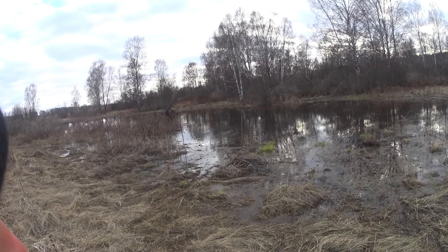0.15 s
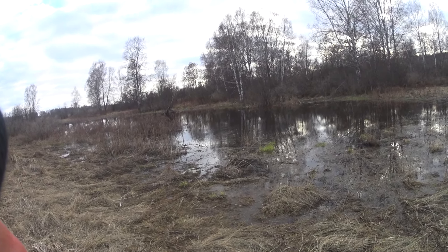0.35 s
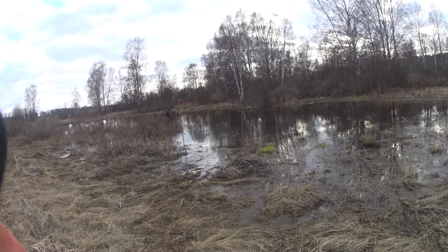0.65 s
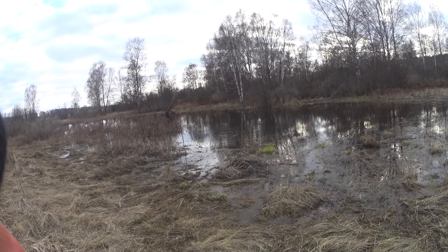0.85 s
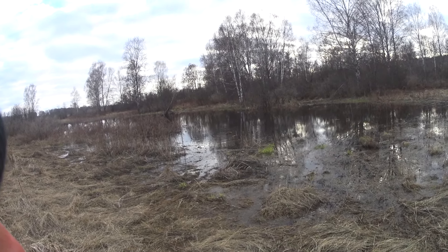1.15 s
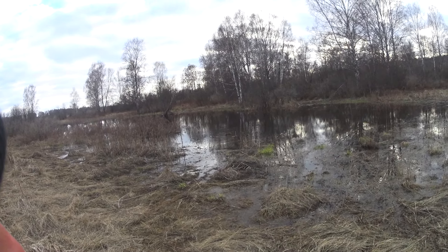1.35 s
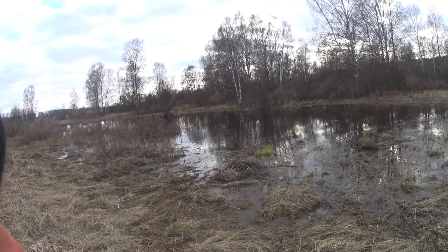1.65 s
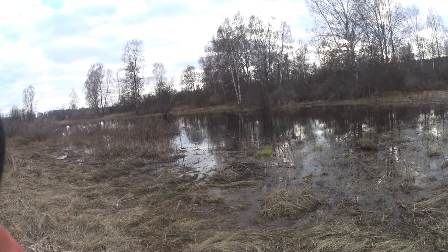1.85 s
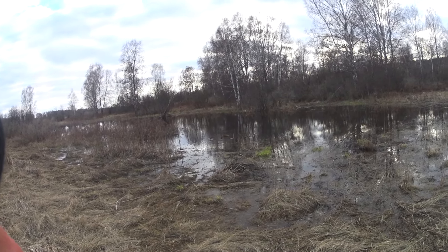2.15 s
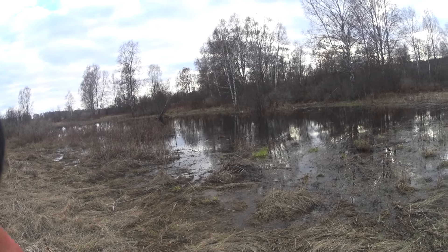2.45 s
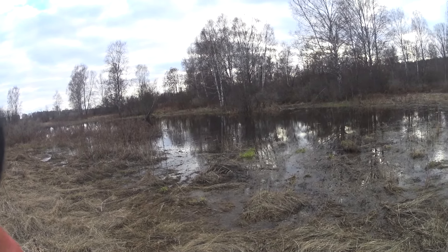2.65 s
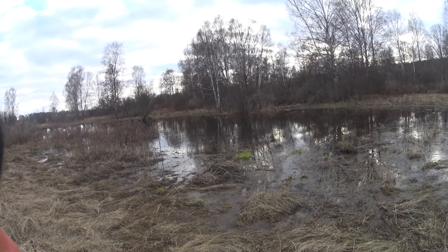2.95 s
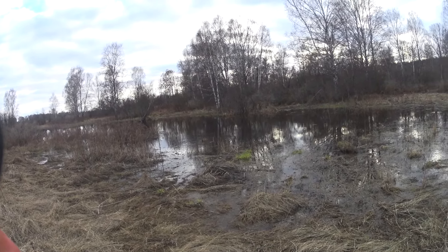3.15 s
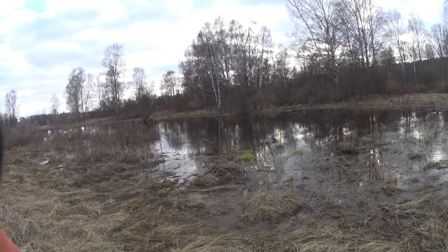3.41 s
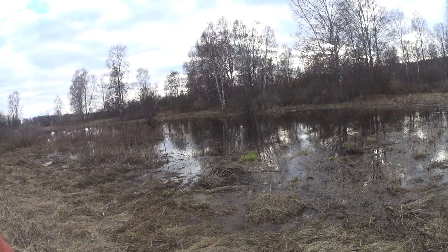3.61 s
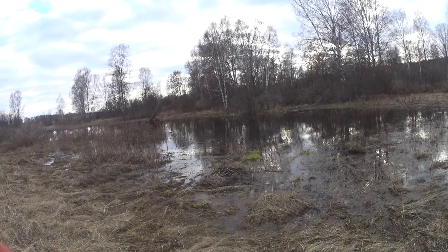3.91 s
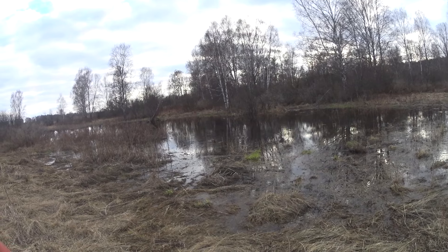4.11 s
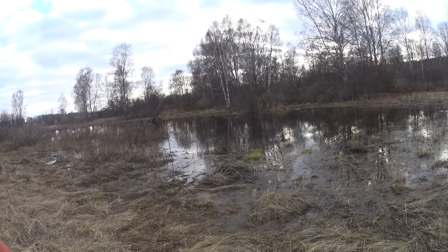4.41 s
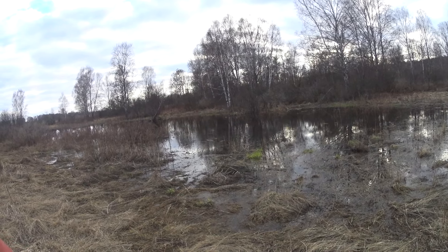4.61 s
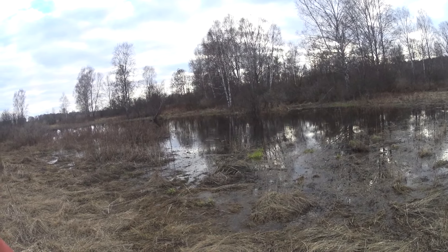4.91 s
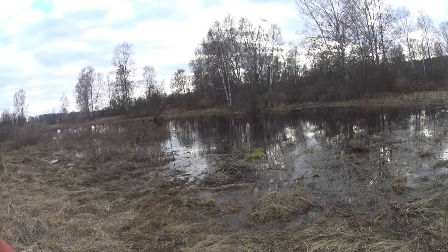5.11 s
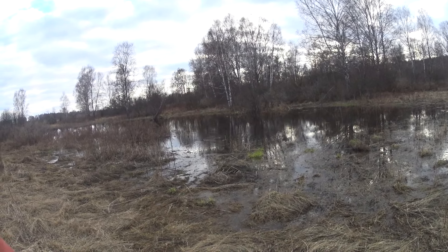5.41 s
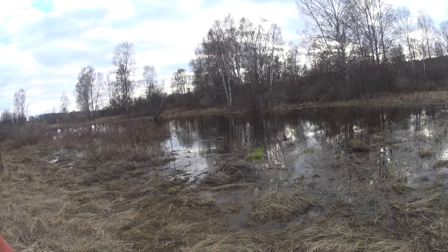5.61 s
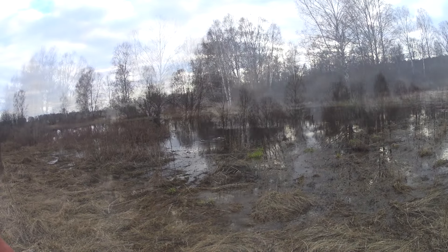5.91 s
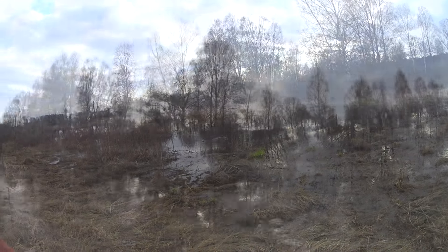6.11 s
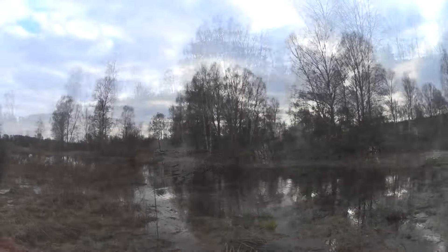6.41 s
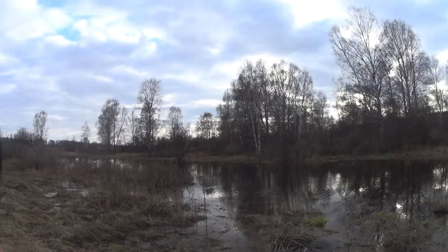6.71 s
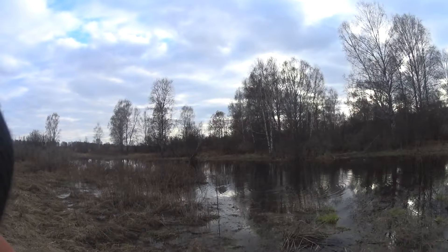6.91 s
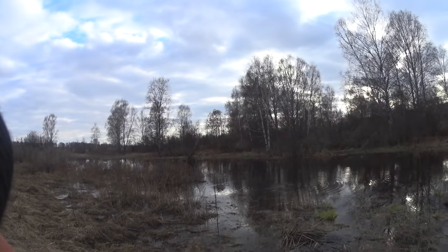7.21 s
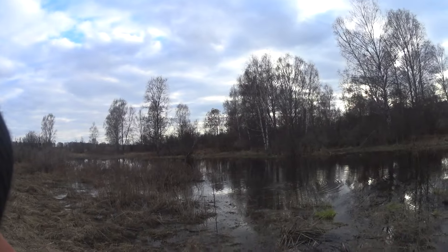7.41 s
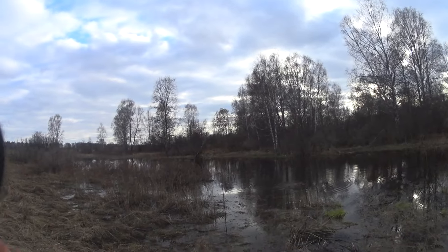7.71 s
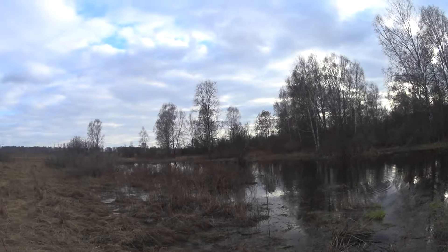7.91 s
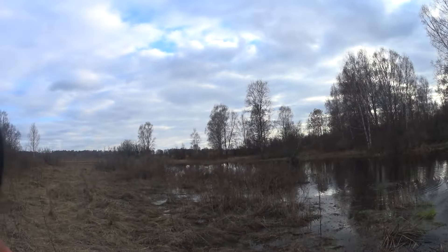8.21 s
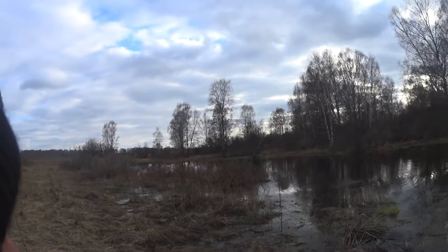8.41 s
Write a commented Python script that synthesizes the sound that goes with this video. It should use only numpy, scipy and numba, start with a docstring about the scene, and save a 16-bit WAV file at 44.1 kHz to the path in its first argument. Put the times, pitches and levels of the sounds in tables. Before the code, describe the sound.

Open marsh, heard through a small stereo camera microphone with little extreme treble. A faint, dull distant roar and a deep, unevenly throbbing rumble run throughout, the rumble slowly growing, with soft low thumps near 0.9, 1.6, 3.9, 4.2 and 5 seconds. A hen duck gives short, raspy, nasal quacks, each under 0.2 seconds, scooping up, breaking register and shutting off; trees answer faintly. Quacks come at 0.04, 0.7, 1.4 and 2.2 seconds, gaining strength. Tiny dry ticks sound at 2.9 and 3.3 during a pause. Another quack comes at 4.8, then a very faint one at 5.7. Close ticks appear at 5.6 and 5.95, with the sharpest at 6.2. From 5.6 to 6.6 the background crossfades into a clearly louder roar. Three final quacks follow at 6.35, 7.06 and 7.7, the last two loudest, before background alone remains.

```python
"""A distant roar and a low, throbbing rumble (shaped noise) lie under a marsh from beginning to end.
From the start a hen decoy duck quacks nine times: paired claps ring a throat that slides as the bill opens,
with rasping air on top. Each quack scoops up, breaks to another register and ends; trees answer faintly.
From about 3 s a few dry ticks (tiny noise bursts) sound close by, most of them near 6 s.
Around 6 s the scene fades to a second spot with a louder roar, where the last three quacks are heard."""
import sys
import numpy as np
from scipy import signal
from scipy.fft import rfft, irfft, next_fast_len
from scipy.io import wavfile
from scipy.ndimage import uniform_filter1d
from numba import njit

SR = 44100
rng = np.random.default_rng(int(sys.argv[2]) if len(sys.argv) > 2 else 0)


def store_wav(level_fs):
    """Save 16-bit WAV to argv[1]."""
    pcm = np.round(np.clip(np.atleast_2d(level_fs), -1, 1) * 32767)
    wavfile.write(sys.argv[1], SR, pcm.T.astype(np.int16))


N = 377055
TIME = np.arange(N) / SR  # seconds
# the fade from the first spot to the second (seconds)
FADE_START_S, FADE_LENGTH_S = 5.625, 1


def undb(db):
    """Turn decibels into a gain."""
    return 10 ** (np.asarray(db) / 20)


def unit(x):
    """Scale a sound to an rms of 1."""
    return x / np.sqrt(np.mean(x ** 2))


def over_hz(points, hz):
    """Read a curve of (Hz, value) points on a log-frequency axis."""
    point_hz, value = np.transpose(points)
    return np.interp(np.log(hz), np.log(point_hz), value)


def colour(x, points):
    """Filter to a (Hz, dB) curve without sounding early, so that claps keep their sharp front."""
    size = 2 * next_fast_len(x.shape[-1] // 2 + 1)
    hz = np.maximum(np.fft.rfftfreq(size, 1 / SR), 1)
    # folding the cepstrum gives the filter that reacts soonest (minimum phase)
    cepstrum = irfft(np.log(undb(over_hz(points, hz))))
    cepstrum[1:size // 2] *= 2
    cepstrum[size // 2 + 1:] = 0
    response = np.exp(rfft(cepstrum))
    return irfft(rfft(x, size) * response, size)[..., :x.shape[-1]]


def walk(rate, size):
    """Wander slowly: random levels, drawn `rate` times a second and smoothed."""
    hold = int(SR / rate)
    levels = np.repeat(rng.standard_normal(size // hold + 1), hold)
    return uniform_filter1d(levels, hold)[:size]


@njit
def resonate(x, hz, width):
    """Ring around a centre frequency that may move with every sample (a band-pass)."""
    y, band, low = np.empty(len(x)), 0., 0.
    for i in range(len(x)):
        g, damping = np.tan(np.pi * hz[i] / SR), width / hz[i]
        v = (band + g * (x[i] + 1e-18 - low)) / (1 + g * (g + damping))
        band, low, y[i] = 2 * v - band, low + 2 * g * v, damping * v
    return y


def clicks(at, sizes, count):
    """Place smooth, band-limited clicks, which may fall between two samples."""
    taps = at.astype(int)[:, None] + np.arange(-6, 8)
    off = taps - at[:, None]
    shape = np.sinc(off) * np.cos(np.pi * off / 14) ** 2
    inside = np.clip(taps, 0, count - 1)
    return np.bincount(inside.ravel(), (shape * sizes[:, None]).ravel(), count)


def steady(x, hz):
    """Hold the rms near 1 over a few cycles of pitch hz."""
    k = int(2 * SR / hz)
    power = uniform_filter1d(uniform_filter1d(x ** 2, k), k)
    return x / np.sqrt(np.maximum(power, np.mean(power) / 20))


def scatter(x, per_s, t60_s, onset_s, unlike):
    """Many small reflectors each return a faint copy, somewhat unlike at the two ports."""
    t = TIME[:int(t60_s * SR)]
    hit = rng.random(len(t)) < per_s / SR
    size = rng.choice([-1, 1], len(t)) + unlike * rng.standard_normal((2, len(t)))
    tail = hit * size * undb(-60 * t / t60_s) * (1 - np.exp(-t / onset_s))
    # the tail's energy, averaged over both ports, becomes 1
    tail = tail / np.sqrt(np.sum(tail ** 2) / 2)
    return signal.fftconvolve(x[None], tail, axes=1)[:, :N]


def far_noise(points, flicker_db=1.26):
    """Noise whose low and high parts waver on their own; the ports agree in the bass, less in the treble."""
    mid, side = (colour(rng.standard_normal(N), points) for _ in range(2))
    side = colour(side, [(60, -25.5), (250, -15.5), (1000, -11), (2500, 6), (6000, 0)])
    low = signal.sosfiltfilt(signal.butter(2, 500, fs=SR, output="sos"), mid)
    high = mid - low
    wavering = low * undb(flicker_db * walk(9.9, N)) + high * undb(flicker_db * walk(6.4, N))
    return (wavering + np.array([side, -side])) / np.std(mid)


# Colour of the distant roar at each spot. Each row: frequency in Hz, relative noise strength in dB.
ROAR_FIRST = [(71, -38), (120, -7), (129, -24), (151, -7), (193, -6.5), (286, -8), (321, -8.5), (459, -6),
              (696, -2), (1140, -5.5), (1570, -18.5), (1900, -25.5), (3160, -32), (11000, -40.5),
              (14300, -75), (22000, -120)]
ROAR_SECOND = [(71, -32), (120, -6.5), (242, -7.5), (281, -2.5), (395, -6), (451, -5), (696, -5),
               (1020, -10), (1160, -9.5), (1270, -14), (1690, -24), (2080, -28.5), (2930, -40.5),
               (11000, -50.5), (14300, -83), (22000, -120)]
ROAR_FIRST_DB, ROAR_SECOND_DB = -46.7, -37
ROAR_BALANCE_DB = -1  # left minus right


def distant_roar():
    """Two shaped noises, one for each spot, fade from the first to the second."""
    share = np.clip((TIME - FADE_START_S) / FADE_LENGTH_S, 0, 1)
    first = np.sqrt(1 - share) * undb(ROAR_FIRST_DB) * far_noise(ROAR_FIRST)
    second = share * undb(ROAR_SECOND_DB) * far_noise(ROAR_SECOND)
    lean = undb(np.array([[ROAR_BALANCE_DB], [-ROAR_BALANCE_DB]]) / 2)
    return lean * (first + second)


# Colour of the low rumble. Each row: frequency in Hz, relative noise strength in dB.
RUMBLE_TONE = [(15, -22), (30, -10.5), (45, -11.5), (62, -3), (92, -4), (112, -15.5), (170, -49),
               (400, -64)]
# Soft low thumps in the rumble. Each row: time of the peak in seconds, lift in dB.
RUMBLE_THUMPS = [(0.86, 7), (1.57, 7), (3.88, 3.5), (4.19, 5.5), (5.0, 6)]
# level at the start, growth, depth of the random throb, width of a thump
RUMBLE_DB, RUMBLE_DB_PER_S, THROB_DB, THUMP_S = -58, 1.58, 2.5, 0.065


def low_rumble():
    """Deep noise grows slowly, throbs at random and swells briefly at each thump."""
    thumps_db = sum(db * np.exp(-((TIME - s) / THUMP_S) ** 2) for s, db in RUMBLE_THUMPS)
    rumble_db = RUMBLE_DB + RUMBLE_DB_PER_S * TIME + THROB_DB * walk(8.6, N) + thumps_db
    return undb(rumble_db) * far_noise(RUMBLE_TONE)


# Dry ticks. Each row: time in seconds, peak level in dB.
TICK_TIMES = [(2.8956, -37), (3.3122, -45), (5.604, -36.5), (5.9509, -23.5), (6.2077, -11.5), (6.2156, -24),
              (6.226, -38)]
# Colour of a tick. Each row: frequency in Hz, relative strength in dB.
TICK_TONE = [(880, -46), (1500, -9), (1660, -6.5), (2410, -0.5), (3070, -11), (3450, -10), (4430, -8),
             (5990, -3), (8640, -10), (9950, 1.5), (11000, -10), (14300, -45), (22000, -120)]


def ticks(decay_s=0.001):
    """Short noise bursts snap close by, each gone in a few milliseconds."""
    out = np.zeros((2, N + SR))
    t = TIME[:SR // 40] - .004
    for start, db in TICK_TIMES:
        burst = rng.standard_normal((3, len(t))) * (t >= 0) * np.exp(-abs(t) / decay_s)
        # one burst is shared by both ports, the other two belong to one port each
        snap = colour(burst[0] + 2.1 * burst[1:], TICK_TONE)
        first = int((start + t[0]) * SR)
        out[:, first:first + len(t)] += undb(db) * snap / abs(snap).max()
    return out[:, :N]


def tree_line(x):
    """The trunks across the water answer with a long, dull tail."""
    echo = scatter(x, per_s=600, t60_s=1.4, onset_s=.025, unlike=.5)
    return colour(echo, [(300, -4), (1200, -4.0), (2100, -4.5), (4000, 2.5), (10000, -16)])


def dry_grass(x):
    """Stalks near the camera scatter the treble for a few milliseconds."""
    glints = scatter(x, per_s=6000, t60_s=.02, onset_s=.0005, unlike=3)
    return colour(glints, [(1000, -54), (2400, -68), (3500, -5.5), (10000, -6.5)])


# Loudness of the duck at the two ports, for each spot. Each row: frequency in Hz, left minus right in dB.
LEAN_FIRST = [(500, 1), (1300, 0.5), (1600, 2.5), (1880, 12.5), (2250, -1.5), (2650, 7), (3100, -12),
              (4200, 4), (4800, -10), (6000, -0.5), (10000, 2)]
LEAN_SECOND = [(500, 0.5), (1300, 1), (1800, 1), (2500, 0), (3300, -20), (4200, -5), (6000, 0.5),
               (10000, 1.5)]
# Timing of the duck at the two ports, for each spot. Each row: frequency in Hz, lead of the left in radians.
LEAD_FIRST = [(100, 0.4), (400, 0.37), (1200, 0.47), (1700, 1), (2100, -0.28), (3000, -0.84), (4500, 0.8),
              (10000, 0.93)]
LEAD_SECOND = [(100, 0), (400, 0.29), (1200, 0.4), (1800, -0.16), (2800, -0.66), (4200, 0.96),
               (10000, -0.41)]


def ports(x, balance, phase):
    """The camera body shades and delays the sound differently for its two microphone ports."""
    size = next_fast_len(N)
    hz = np.maximum(np.fft.rfftfreq(size, 1 / SR), 1)
    lean = undb(over_hz(balance, hz) / 2) * np.exp(.5j * over_hz(phase, hz))
    pair = np.array([lean, 1 / lean])
    # the average of both ports keeps its spectrum
    pair = pair / abs(pair.mean(axis=0))
    return irfft(rfft(x, size) * pair, size)[:, :N]


# rebound of each clap: relative size, and delay in periods of the main resonance
REBOUND, REBOUND_TURNS = 0.68, 4.07


def syrinx(pitch, throat_hz, rough):
    """A clap each cycle and a weaker rebound about 2 ms later; roughness makes both stumble in time and size."""
    cycle = np.cumsum(pitch) / SR
    at = np.interp(np.arange(1, int(cycle[-1])), cycle, np.arange(len(pitch)))
    r, ring_hz = rough[at.astype(int)], throat_hz[at.astype(int)]
    chance = rng.standard_normal((len(at), 4)).T
    at = at + SR * .00026 * r ** 1.7 * chance[0]
    late = at + SR * (REBOUND_TURNS / ring_hz + .0003 * r ** 1.3 * chance[1])
    size = undb((.4 + 3 * r) * chance[2])
    late_size = REBOUND * undb(5 * r * chance[3])
    return clicks(np.r_[at, late], np.r_[size, late_size], len(pitch))


# Resonances of the throat and bill, before each quack adjusts them.
# Each row: frequency in Hz when wide open, width in Hz, level in dB.
RESONANCES = [(350, 1700, -13), (1262, 134, -9), (1804, 250, 6), (2024, 127, 6), (2290, 180, -1),
              (2730, 220, -13), (3070, 220, -3.5)]
OPEN_HZ = 1780  # main resonance that counts as wide open


def throat(source, throat_hz, ring_db, low_db, upper_db, ring_width_hz=110, shut_db=-60):
    """Claps strike resonances that slide up as the bill opens; a half-shut bill muffles the upper ones."""
    opening = throat_hz / OPEN_HZ
    muffle_db = shut_db * np.maximum(1 - opening, 0)
    out = undb(ring_db) * resonate(source, throat_hz, float(ring_width_hz))
    for k, (hz, width, db) in enumerate(RESONANCES):
        db = db + low_db * (k < 2) + upper_db * (k > 2) + muffle_db * max(k - 1, 0) / 2
        out = out + undb(db) * resonate(source, hz * opening, float(width))
    # the membranes close softly, which rounds each clap and takes away its treble
    rounded = signal.sosfiltfilt(signal.butter(4, 2650, fs=SR, output="sos"), out)
    return colour(rounded, [(100, -13), (300, 3.0), (700, -3), (1000, 7.5), (2400, -3.0), (3150, -6.5),
                            (3600, -0.5), (11000, -36)])


# the pitch scoops up and sags at the end (shares of the top pitch; sag time in seconds)
SCOOP, SAG, SAG_S = .18, 0.0286, .03
# the bill opens quickly, and the throat settles after the break (shares of the open throat; time in seconds)
SHUT, MOST_SHUT, OPENING_S, SETTLE = 0.31, 0.406, 0.025, 0.027
# the voice swells from below its level; the rasp comes in later and takes a share of the lift at the break
ONSET_DB, SWELL_S, RASP_ONSET_DB, RASP_SWELL_S, RASP_LIFT_SHARE = -12, .012, -10.5, 0.039, 0.48
# the voice stumbles as it starts and as it breaks (roughness, 0-1)
ROUGH_BEFORE, ROUGH_ONSET, ROUGH_BREAK = .21, .4, .45
BREAK_S, CRACK_S, CRACK_RASP_DB = 0.0095, 0.016, 5


def gesture(age, length, top_hz, rise_s, open_hz, level_db, break_s, lift_db, rough_after, crack):
    """Pitch and bill rise, the voice breaks into another register, then sags and cracks shut."""
    shut = np.minimum(SHUT * np.exp(-age / OPENING_S), MOST_SHUT)
    age = np.clip(age, 0, length)
    starting = np.exp(-(age / SWELL_S) ** 2)
    pushed = (1 + np.tanh((age - break_s) / BREAK_S)) / 2  # 0 before the break, 1 after
    breaking = np.exp(-((age - break_s) / BREAK_S) ** 2)
    cracking = crack * np.exp((age - length) / CRACK_S)
    scoop = SCOOP * np.exp(-(age / rise_s) ** 2)
    sag = SAG * np.exp((age - length) / SAG_S)
    pitch = top_hz * (1 - scoop - sag)
    throat_hz = open_hz * (1 - shut - SETTLE * pushed)
    swelling_db = level_db + ONSET_DB * starting
    voice_db = swelling_db + lift_db * pushed
    air_db = (swelling_db + RASP_ONSET_DB * np.exp(-(age / RASP_SWELL_S) ** 2)
              + RASP_LIFT_SHARE * lift_db * pushed + CRACK_RASP_DB * cracking)
    rough = ROUGH_BEFORE * (1 - pushed) + rough_after * pushed
    rough = rough + ROUGH_ONSET * starting + ROUGH_BREAK * breaking + cracking
    return pitch, throat_hz, voice_db, air_db, np.clip(rough, 0, 1), pushed


# before the break the throat rings more and its upper resonances are weak; the rasp grows airier throughout
RING_BEFORE_DB, RING_AFTER_DB, UPPER_BEFORE_DB, AIR_DB_PER_S = -3.5, -10, -6.5, 23
# Colour of the rasp at each spot. Each row: frequency in Hz, relative strength in dB.
RASP_TONE_FIRST = [(1500, 2.5), (2750, 2.5), (3120, 3), (3480, -4), (3870, 2.5), (4330, -6), (4800, 1),
                   (5400, -2), (6100, -6.5), (6800, -8), (7800, -19), (9600, -15), (11200, -24)]
RASP_TONE_SECOND = [(1500, -33), (2750, -23), (3150, 8.5), (3550, -0.5), (3950, 0.5), (4500, 5),
                    (5400, 1.5), (6600, -0.5), (7900, -17), (9000, -13), (10200, -4.5), (11200, -12.5)]
# The nine quacks.
# Each row: start in seconds, length in seconds, top pitch in Hz, pitch rise time in seconds, open throat in Hz,
# level in dB, delay of the break in seconds, lift at the break in dB, roughness after the break from 0 to 1,
# closing crack from 0 to 1, rasp against the voice in dB, rasp treble in dB, bill resonance in Hz,
# change of the low resonances in dB, change of the upper resonances in dB, echo against the quack in dB.
DUCK_QUACKS = [(0.04, 0.18, 172, 0.066, 1794, -33, 0.12, 5, 0.22, 0.07, -24, 12, 2880, 7.5, 11, -16.5),
               (0.712, 0.19, 175.8, 0.074, 1795, -29, 0.089, 4.5, 0.32, 0.1, -19.5, 6.5, 3660, 2, 9.5, -23),
               (1.413, 0.18, 169.8, 0.043, 1825, -27, 0.11, 2.5, 0.7, 0, -16, 1, 4670, 0.5, 5, -25.5),
               (2.2, 0.17, 181.5, 0.042, 1954, -26, 0.097, 0, 0.38, 0.33, -14.5, 1.5, 4670, 0.5, 2, -25),
               (4.761, 0.14, 162.7, 0.03, 1793, -27.5, 0.086, 0.5, 0.71, 0.2, -15, -0.5, 5200, 1, 2.5, -17.5),
               (5.716, 0.13, 176.4, 0.031, 1970, -47.5, 0.052, 6.5, 0.17, 0.4, -12, 2, 3190, 2, -8, -7),
               (6.351, 0.1838, 180.8, 0.053, 1872, -27, 0.093, 7.5, 0, 0.5, -21, -5, 6400, 0.5, 1.5, -22.5),
               (7.06, 0.17, 175.4, 0.045, 1890, -22, 0.088, -0.2, 0.31, 0.32, -20.5, 3.5, 4830, 2.5, -3, -23.5),
               (7.714, 0.18, 178, 0.052, 1860, -23, 0.084, 4, 0.02, 0.73, -16.5, 0, 5250, 2, -12, -26)]


def quack(row, rasp_colour, puff_s=0.00098, attack_s=0.0083, release_s=0.0041, bill_width_hz=650, bill_db=-3):
    """Claps ring the throat and puffs of air rasp; gives the direct sound and the share sent to the trees."""
    start, length, *shape, rasp_db, treble_db, bill_hz, low_db, upper_db, echo_db = row
    span = (TIME > start - .04) & (TIME < start + length + .04)
    age = TIME[span] - start
    pitch, throat_hz, voice_db, air_db, rough, pushed = gesture(age, length, *shape)
    ring_db = RING_BEFORE_DB * (1 - pushed) + RING_AFTER_DB * pushed
    upper_db = upper_db + UPPER_BEFORE_DB * (1 - pushed)

    claps = syrinx(pitch, throat_hz, rough)
    # each clap lets out a puff of noisy air that dies away
    puffs = signal.lfilter([1], [1, -np.exp(-1 / (puff_s * SR))], claps)
    air = unit(puffs * rng.standard_normal(len(age)))
    claps = unit(claps)
    voice = throat(claps + (.1 + .4 * rough ** 2) * air, throat_hz, ring_db, low_db, upper_db)

    # the rasp is reedy up to about 4 kHz and mostly air above
    bright_air = colour(air, [(3000, -9), (4200, -1), (6000, 5)])
    rasp = claps + undb(AIR_DB_PER_S * (age - length / 2)) * bright_air
    # the bill lifts one band of it
    bill = resonate(rasp, np.full(len(age), float(bill_hz)), float(bill_width_hz))
    rasp = colour(rasp + undb(bill_db) * bill, rasp_colour)
    rasp = colour(rasp, [(3000, 3.0), (6000, -8.5 + treble_db / 2), (10000, -2.0 + treble_db)])

    gate = np.exp(np.minimum(age, 0) / attack_s - np.maximum(age - length, 0) / release_s)
    voice = undb(voice_db) * steady(voice, pitch.mean())
    rasp = undb(air_db + rasp_db) * steady(rasp, pitch.mean())
    out = np.zeros(N)
    out[span] = gate * (voice + rasp)
    return np.array([out, undb(echo_db) * out])


def scene():
    """Add the marsh, the ticks, the echoes and the duck at both spots."""
    middle = FADE_START_S + FADE_LENGTH_S / 2
    first, first_echo = sum(quack(row, RASP_TONE_FIRST) for row in DUCK_QUACKS if row[0] < middle)
    second, second_echo = sum(quack(row, RASP_TONE_SECOND) for row in DUCK_QUACKS if row[0] >= middle)
    duck = ports(first, LEAN_FIRST, LEAD_FIRST) + ports(second, LEAN_SECOND, LEAD_SECOND)
    echoes = dry_grass(first + second) + tree_line(first_echo + second_echo)
    return distant_roar() + low_rumble() + ticks() + echoes + duck


def record(dry):
    """The camera cuts the top steeply, above 11100 Hz."""
    return signal.sosfilt(signal.ellip(10, .2, 70, 11100, fs=SR, output="sos"), dry)


dry = scene()
out = record(dry)
store_wav(out)
```